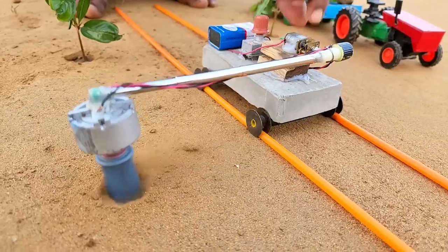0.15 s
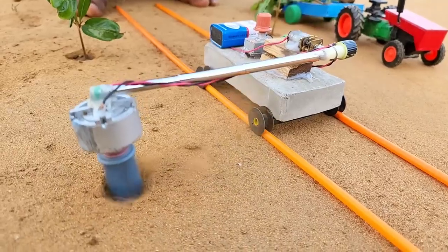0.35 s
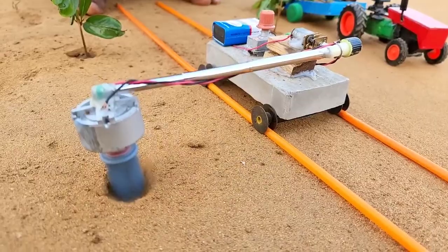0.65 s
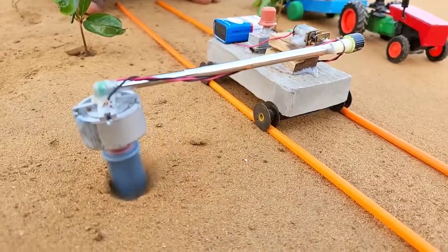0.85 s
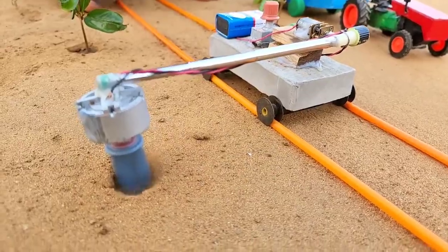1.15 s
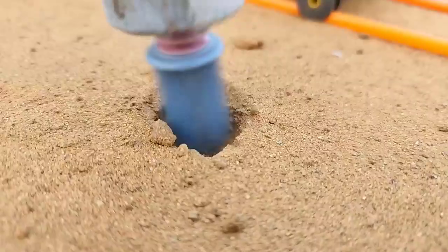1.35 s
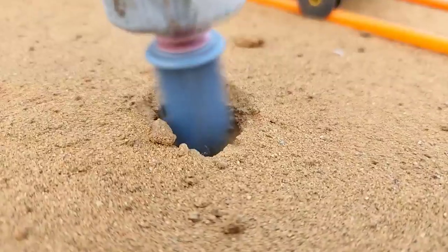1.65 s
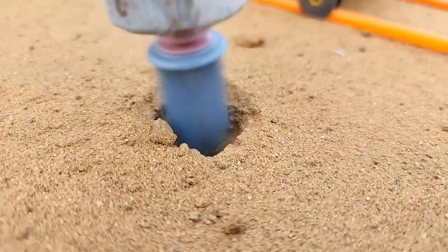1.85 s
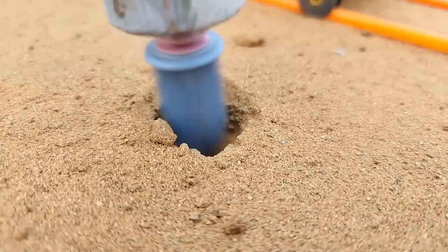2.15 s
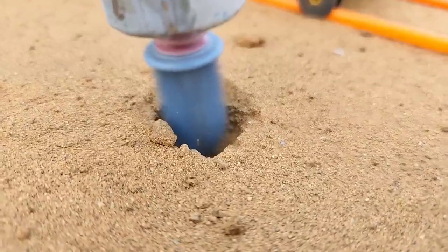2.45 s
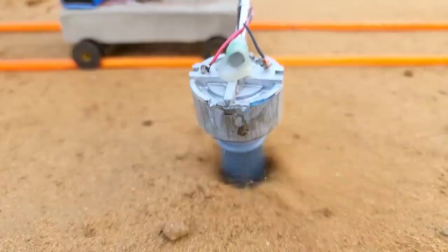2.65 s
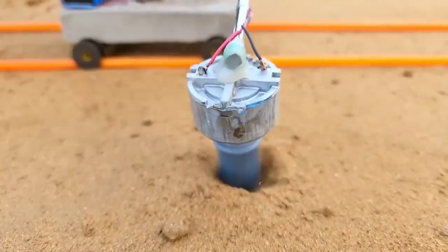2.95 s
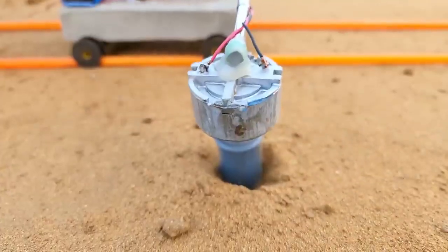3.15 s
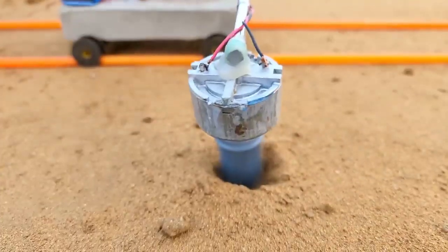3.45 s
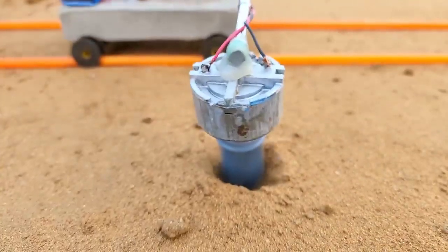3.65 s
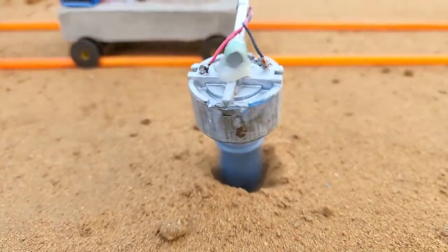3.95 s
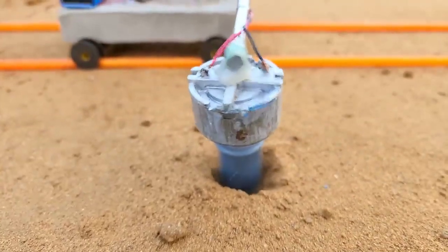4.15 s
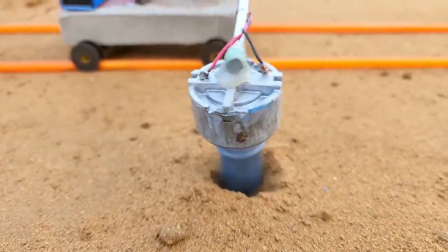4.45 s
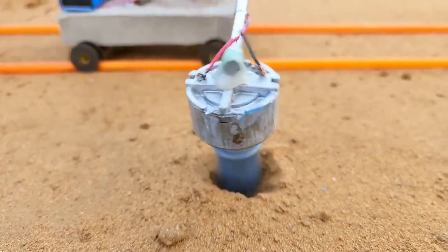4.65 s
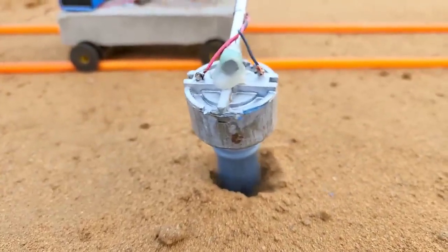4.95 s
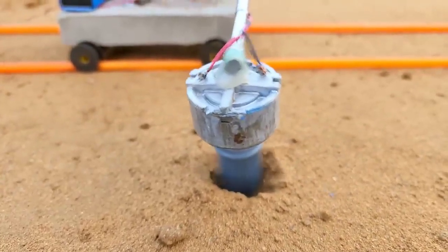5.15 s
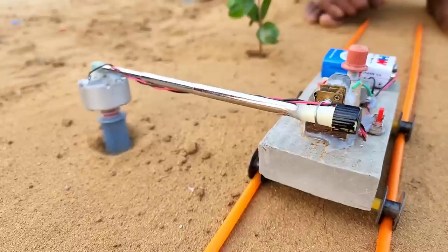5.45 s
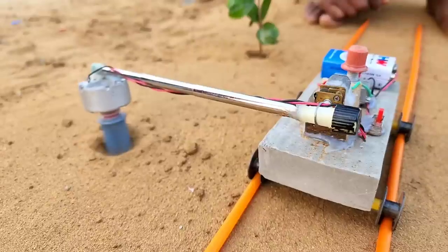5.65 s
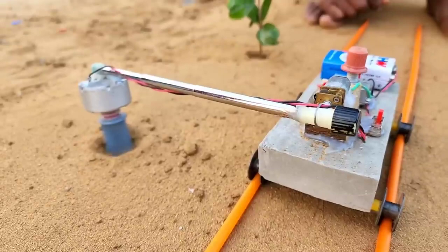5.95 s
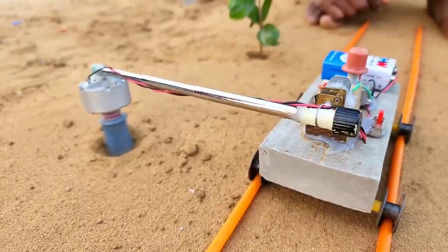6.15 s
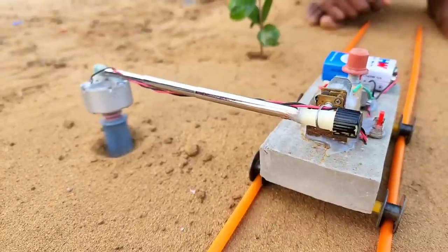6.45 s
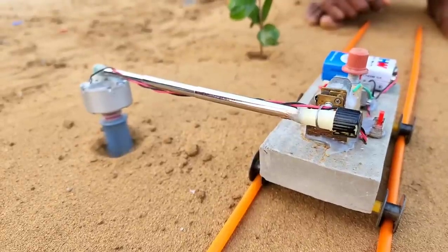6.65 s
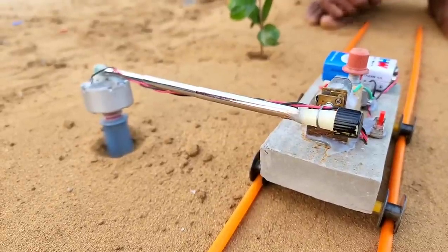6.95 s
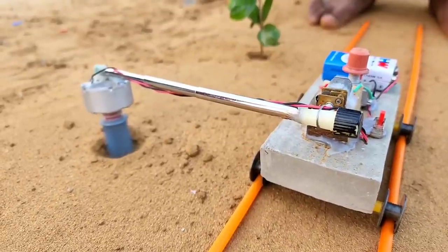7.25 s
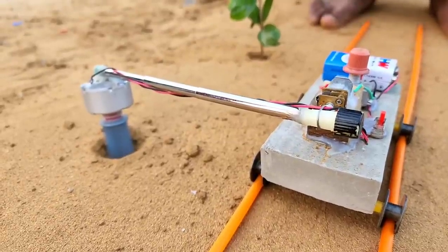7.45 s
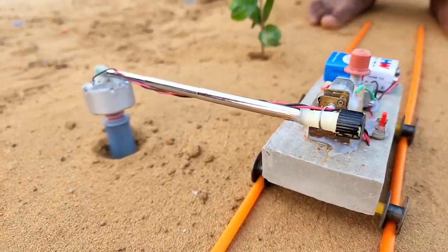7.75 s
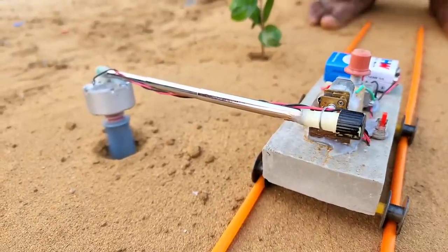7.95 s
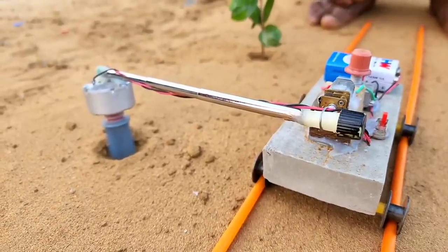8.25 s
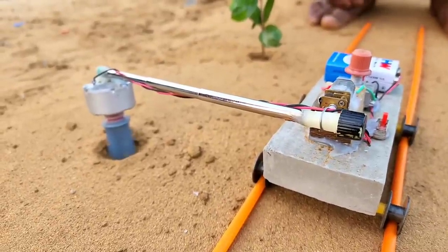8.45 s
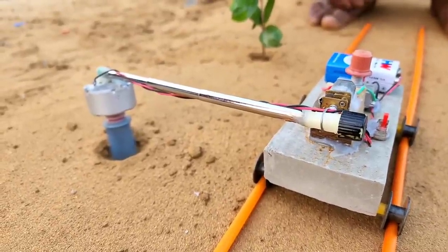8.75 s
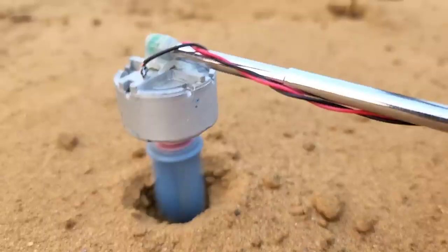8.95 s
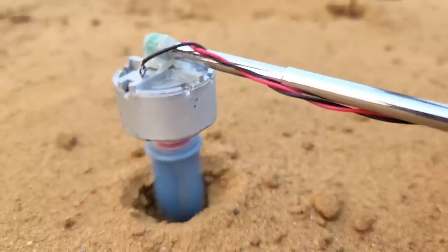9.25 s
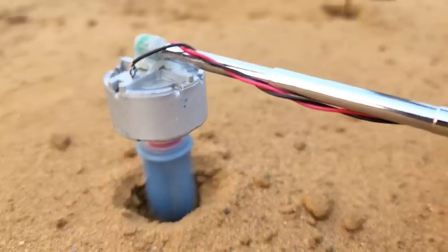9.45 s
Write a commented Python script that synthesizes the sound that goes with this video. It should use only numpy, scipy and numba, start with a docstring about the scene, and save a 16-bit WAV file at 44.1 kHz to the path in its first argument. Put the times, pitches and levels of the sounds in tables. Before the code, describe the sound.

A loose little rotor clatters rapidly against its housing while a plastic tube grinds in dry sand. The buzz rises early, settles, vanishes for an instant, then returns quicker, rough and choked, with many hard ticks and scrapes. Towards the end it becomes lower and more regular, still gritty, with a faint hum and occasional knocks. Close handheld stereo microphone in open air, bright and hissy, with soft wind rumble.

```python
"""A small electric motor turns a plastic auger in sand, heard outdoors through two microphone ports.
The loose rotor knocks its housing each turn, with stray knocks, grinding grit and wind; it speeds up near 0.6 s.
At 2.6 s the sound drops out briefly; then the motor runs faster, and the auger often sticks and breaks free.
From 5.45 to 6.2 s the recorder moves to its last hold and a faint hum comes in; near 7.4 s the thump sings out.
Knocks and grit are shaped noise, the thump is filtered clicks, the hum is sines and the wind is low noise."""
import sys
import numpy as np
from scipy import signal
from scipy.fft import rfft, irfft
from scipy.io import wavfile
from scipy.ndimage import uniform_filter1d
from numba import njit

SR = 44100
rng = np.random.default_rng(int(sys.argv[2]) if len(sys.argv) > 2 else 0)


def log_audio(samples):
    """Write samples as a 16-bit WAV file to the path given in sys.argv[1]."""
    # one column per channel
    frames = np.atleast_2d(samples).T
    # limit to full scale, then quantise
    limited = np.clip(frames, -1, 1)
    pcm = np.round(limited * 32767).astype(np.int16)
    wavfile.write(sys.argv[1], SR, pcm)


N = 422478  # length [samples]

# motor speed: (time [s], speed [turns per s])
SPEED = [(0.0, 71), (0.25, 71.9), (0.47, 81.6), (0.51, 86), (0.62, 93.8), (0.87, 92.8), (0.92, 89.7),
         (1.01, 80.9), (1.06, 79), (1.46, 74.9), (1.55, 75.3), (1.72, 78.0), (1.93, 71.8), (2.09, 72.4),
         (2.22, 65.6), (2.29, 65.6), (2.5, 70.4), (2.6, 71.8), (2.64, 85), (4.1, 87), (5.2, 83), (6.1, 74),
         (6.65, 69.5), (6.9, 72), (7.49, 72.2), (7.81, 76.1), (8.22, 75.8), (8.41, 73.9), (8.93, 76),
         (9.58, 75.5)]
# how much the speed wavers, one value a hold: (share of the speed [1])
UNSTEADY = [.001, .002, .02, .005]
START_TURN = 0.8  # part of a turn already made at the start


def rotor():
    """Adding up the wavering speed gives the turns made so far."""
    wavering = 1 + by_hold(UNSTEADY) * drift(25)
    turns_per_s = in_time(SPEED)[0] * wavering
    return START_TURN + np.cumsum(turns_per_s) / SR


# how the auger meets the sand: (time [s], bite [0 free - 1 held], stutter [dB])
BITE = [(0, 0.2, -2.5), (.5, 0.045, 0), (.66, 0.01, 5), (.75, 0.18, 2.2), (1.4, 0.28, 0.5),
        (2.6, 0.68, 0.7), (2.64, 0.62, 0), (3.4, 0.44, 2.4), (4.2, 0.5, 1.3), (5.4, 0.37, 0.5),
        (5.85, 0.46, 3), (6.3, 0.32, 1.5), (7.3, 0.24, 1.5), (7.9, 0.27, 0.2), (8.7, .27, 1.3),
        (9.58, 0.25, 3.2)]
# the rattle, one row a hold: (grit [dB], rotor thump [dB], change of knocks and grit in the two low bands [dB])
RATTLE = [(-10.5, 17.5, -14), (-10, 18.5, -6), (-13.5, 5.5, -1.3), (-12, 7.5, -4.5)]
# bands in which a knock has a strength of its own:
# (low end [Hz], high end [Hz], likeness at the two ports [0-1], burst width [s], extra grit [dB])
KNOCK_BANDS = [(40, 727, 0.79, 0.0021, -1), (870, 1930, 0.4, .002, 0), (2160, 4900, 0.1, 0.0016, 3.5),
               (4920, 18000, 0.24, .0018, -1)]
# colour given by housing and auger: (frequency [Hz], gain [dB])
BODY = [(60, -16.5), (180, -3.5), (340, -8.5), (640, 10), (900, 7), (1600, 1), (3000, -3), (6000, 2.5),
        (10000, -2), (14500, -2.5), (15400, 3), (15900, -18), (16100, -47)]
# knocks and grit, relative levels before the rattle is brought to its loudness
KNOCK_FREE_DB, KNOCK_HELD_DB = 3.5, -28.5  # knock of each turn
STRAY_FREE_PER_S, STRAY_HELD_PER_S = 43, 170  # how many stray knocks
GRIT_FREE_DB, GRIT_HELD_DB = -2, 0.5  # change of the grit with the bite
STUTTER_TOP = 0.83  # highest swing [about spreads]: the stutter cuts deeper than it swells


def rattle(turns):
    """Knocks are noise bursts a few ms long, grit is steady noise; the housing colours both, and the thump joins."""
    bite, stutter_db = in_time(BITE)
    knock_db = KNOCK_FREE_DB + bite * (KNOCK_HELD_DB - KNOCK_FREE_DB)
    stray_per_s = STRAY_FREE_PER_S + bite * (STRAY_HELD_PER_S - STRAY_FREE_PER_S)
    grit_db, thump_db, low_bands_db = map(by_hold, np.transpose(RATTLE))
    grit_db = grit_db + GRIT_FREE_DB + bite * (GRIT_HELD_DB - GRIT_FREE_DB)

    each_turn = np.diff(np.floor(turns), prepend=0)
    stray_at = rng.random(N) < stray_per_s / SR
    stray_db = 2.4 * np.minimum(rng.exponential(1, N), 2) - 12
    clicks_of_knocks = each_turn * from_db(knock_db) + stray_at * from_db(stray_db)
    blow_shape = hard_knocks()
    held_db = stalls_db()
    catching = drift(44)
    # it catches and frees itself quickly: part of the slow swing is taken out
    catching = catching - 0.22 * uniform_filter1d(catching, size=SR // 20)

    chatter, blows = 0, 0
    for low_hz, high_hz, alike, burst_s, extra_db in KNOCK_BANDS:
        colour_db = 1.4 * rng.standard_normal(N) + 1.4 * drift(6.4)
        knocks = burst(from_db(colour_db) * clicks_of_knocks, burst_s)
        grit = from_db(grit_db + extra_db)
        swing = np.minimum(catching + 0.64 * drift(33), STUTTER_TOP)
        stutter = from_db(stutter_db * swing + held_db + low_bands_db * (low_hz < 1500))
        noise = two_paths(alike, low_hz, high_hz)
        chatter = chatter + noise * stutter * (knocks + grit)
        blows = blows + noise * blow_shape

    chatter = coloured(chatter, BODY) + rotor_thump(each_turn, thump_db)
    # the treble at the left sets the level, so that the mix follows the loudness curve
    treble = band_pass(chatter[0], 9800, 15000, order=4)
    treble_rms = np.sqrt(uniform_filter1d(treble ** 2, size=SR // 5))
    return chatter * from_db(loudness_db()) / treble_rms + coloured(blows, BODY)


# colour of the thump: (frequency [Hz], gain [dB])
THUMP = [(50, -13.5), (150, -2.5), (300, -6), (600, 5), (1100, 4.5), (1600, 3), (2400, -29.5), (16000, -61)]
# the thump sings out for a moment: (time [s], half width [s], swell [dB])
THUMP_SWELL = (7.4, 0.13, 5.6)
THUMP_PATCHY_DB = 2.5  # each band of the thump comes and goes on its own


def rotor_thump(each_turn, thump_db):
    """One click a turn passes three bands and a colour, so quick regular clicks give a pitch."""
    swell_s, width_s, swell_db = THUMP_SWELL
    distance = (np.arange(N) / SR - swell_s) / width_s
    thump_db = thump_db + swell_db * np.exp(-.5 * distance ** 2)
    pulses = each_turn * from_db(thump_db + 2.0 * drift(2.0) + rng.standard_normal(N))
    pulses = np.roll(pulses, round(0.002976 * SR))  # a few ms later, inside the knock's burst
    thump = 0
    for low_hz, high_hz in [(40, 450), (450, 900), (900, 3000)]:
        patchy = from_db(THUMP_PATCHY_DB * drift(5.1))
        thump = thump + patchy * band_pass(pulses, low_hz, high_hz)
    return coloured(thump[None], THUMP)


# the auger breaks free with a blow: (time [s], relative level [dB])
HARD_KNOCKS = [(.645, -14), (2.631, -8), (2.736, -2), (2.783, -9), (3.157, -8), (3.488, -3.5), (3.534, -12),
               (3.652, -7), (3.722, -6.5), (3.815, -9), (3.881, -2), (3.952, -7.5), (3.973, -4),
               (4.008, -5), (4.033, -10), (4.073, -5), (4.16, -4.5), (4.201, -5), (4.252, -6), (4.502, -6),
               (4.624, -9), (4.644, -12), (4.699, -15), (4.843, -10), (4.996, -15), (5.022, -6),
               (5.424, -1), (5.805, -11), (5.859, -6), (6.028, -7), (6.252, -8), (6.292, -14), (6.668, -10),
               (6.813, -5), (7.108, -8), (7.285, -6.5), (7.466, -9), (7.512, -14), (7.671, -6),
               (8.246, -11), (8.351, -8.5), (8.504, -21), (8.795, -8), (8.845, -6), (9.295, -16),
               (9.51, -5.5)]
KNOCK_LOSS_DB, BLOW_S = -14, 0.00095  # change of every blow; its rise [s]
SCRAPE_S, SCRAPE_DB = 0.0079, -18.5  # scrape after each: decay [s]; level against the blow's click


def hard_knocks():
    """Each blow is a short rise and fall, with a scrape that dies away; noise is shaped by this later."""
    at_s, level_db = np.transpose(HARD_KNOCKS)
    hard = clicks(zip(at_s, level_db + KNOCK_LOSS_DB))
    keep = np.exp(-1 / (SCRAPE_S * SR))
    scrape = signal.lfilter([1], [1, -keep], from_db(SCRAPE_DB) * hard + 1e-18)
    return smooth(hard, BLOW_S) + scrape


# the auger sticks and the rattle weakens: (time [s], dip [dB])
STALLS = [(0.651, -9), (.663, -3), (3.298, -8), (3.322, -5), (3.408, -5), (3.524, -11), (3.547, -19),
          (3.608, -12), (3.785, -5), (3.97, -17), (3.995, -14), (4.052, -11), (4.13, -9), (4.189, -8),
          (4.223, -3), (4.341, -6), (4.407, -8), (4.473, -14), (4.564, -7), (4.62, -9), (4.637, -9),
          (4.665, -10), (4.693, -11), (4.957, -10), (4.986, -16), (5.45, -8), (5.986, -7), (6.014, -9),
          (6.151, -8), (6.275, -3), (6.44, -7), (7.263, -7), (7.565, -7), (8.726, -8), (9.093, -6),
          (9.243, -5), (9.32, -4)]
STALL_S = 0.0036  # half width of a dip
HUSH_DB, HUSH_LEAD_S = -5, 0.0029  # it also sticks just before each blow


def stalls_db():
    """While the auger sticks, the level sinks in a short bell-shaped dip."""
    dips = np.zeros(N)
    stall_s, dip_db = np.transpose(STALLS)
    dips[(stall_s * SR).astype(int)] = dip_db
    blow_s = np.transpose(HARD_KNOCKS)[0]
    dips[((blow_s - HUSH_LEAD_S) * SR).astype(int)] += HUSH_DB
    shape = np.exp(-.5 * (np.arange(-600, 601) / SR / STALL_S) ** 2)
    return signal.oaconvolve(dips, shape, "same")


# treble loudness of the rattle between surges, before ring and ports: (time [s], level [dB])
MOTOR = [(0, -30), (.18, -33.5), (.45, -35), (.66, -33.5), (.85, -34.5), (1.2, -33.5), (2.0, -32.5),
         (2.35, -32), (2.6, -32.5), (2.64, -35), (3.3, -32.5), (3.62, -36), (4.35, -36), (5.2, -34),
         (6.0, -34.5), (6.7, -33.5), (7.1, -32), (7.9, -33), (8.8, -32.5), (9.58, -32)]
# the auger grinds harder for a moment: (time [s], swell [dB])
SURGES = [(1.0, 1), (1.25, 1), (1.83, 2.5), (2.14, 3), (2.75, 2.5), (3.82, 3), (4.12, 1.5), (4.5, 2.5),
          (4.88, 2), (5.38, 2.5), (5.85, 1.5), (6.62, 1)]
SURGE_S = 0.044  # half width of a swell


def loudness_db():
    """The slow level with a bell-shaped swell at each surge."""
    s = np.arange(0, N / SR + .01, .005)
    swells = sum(db * np.exp(-.5 * ((s - at) / SURGE_S) ** 2) for at, db in SURGES)
    return in_time(MOTOR)[0] + np.interp(np.arange(N) / SR, s, swells)


# a ring of the housing that swells and fades with the load: (time [s], centre [Hz], width [Hz], gain [dB])
RING = [(0, 6200, 900, -2), (.45, 6300, 900, -2), (.55, 6300, 800, 3), (.68, 6300, 800, 4),
        (.8, 6330, 900, -2), (1.05, 6250, 900, -2.5), (1.17, 6200, 900, 1.5), (1.5, 6300, 900, -1.5),
        (2.2, 6300, 900, 2), (2.35, 6300, 900, -3), (2.64, 5540, 250, -4.5), (7.5, 5670, 250, -2),
        (8, 5600, 220, 3.5), (9.58, 5840, 250, 5.5)]


def housing_ring(x):
    """The housing strengthens or weakens a moving band of the rattle."""
    return bell(x, *in_time(RING))


# hum on the rotor's first three orders, before it wavers: (level [dB])
HUM_DB = [-58, -61, -63]


def hum(turns):
    """Faint wavering sines at one, two and three times the rotor speed come in with the last hold."""
    heard = by_hold([0, 0, 0, 1])
    tones = 0
    for order, db in enumerate(HUM_DB, start=1):
        strength = np.sqrt(2) * heard * from_db(db + 3.7 * drift(2.2))
        tones = tones + strength * np.sin(2 * np.pi * order * turns)
    return tones


# wind at the left port, before it flutters: (time [s], level [dB])
GUSTS = [(0, -33.5), (.34, -40), (1.5, -44.5), (2.61, -44), (2.8, -41), (4.56, -43.5), (5.9, -41.5),
         (6.6, -49), (7.3, -44), (8.7, -48), (9.58, -46.5)]
# short buffets added to the gusts: (time [s], peak level [dB])
PUFFS = [(0.118, -28), (0.22, -27), (0.568, -33), (0.705, -31), (0.829, -36), (1.05, -32), (1.364, -39),
         (1.652, -34), (2.649, -28.5), (2.827, -27.5), (3.341, -38), (5.83, -41), (6.771, -36)]
# colour of the wind: (frequency [Hz], relative gain [dB])
WIND = [(15, -27), (30, -2.5), (62, 2), (100, -3), (150, -3), (250, -12), (400, -23.5), (800, -31),
        (16000, -87)]
# wind at the right port against the left, one value a hold: (level [dB])
SHELTER_DB = [-34, -20, -4.5, -8]


def wind():
    """Moving air makes a lumpy low rumble with short buffets, from separate noise in each port."""
    rumble = coloured(rng.standard_normal((2, N)), WIND)
    high_pass = signal.butter(2, 40, "high", fs=SR, output="sos")
    rumble = rms_one(signal.sosfilt(high_pass, rumble))
    strength = from_db(in_time(GUSTS)[0]) + smooth(clicks(PUFFS), 0.012)
    left_db = 2.0 * drift(12.0)
    right_db = by_hold(SHELTER_DB) + 1.2 * drift(2.5)
    return rumble * strength * from_db([left_db, right_db])


# how much later the right port hears the rattle, one value a hold: (delay [samples])
LAG_SAMPLES = [23, 18, 14, 16]


def later(x):
    """Sound reaches the right port a little later, depending on the hold."""
    return np.interp(np.arange(N) - np.round(by_hold(LAG_SAMPLES)), np.arange(N), x)


# hollow of the hand at the right port: (time [s], centre [Hz], width [Hz], gain [dB])
HAND = [(0, 3070, 1090, 10.5), (.4, 2950, 1200, 15.5), (.6, 2950, 1200, 15), (.68, 2960, 1280, 18.5),
        (2.6, 3120, 1020, 15), (2.64, 8510, 1800, 18.5), (5.45, 8670, 1860, 16), (5.62, 6430, 4070, 16.5),
        (5.8, 4500, 4230, 12.5), (6.1, 5070, 2300, 12.5), (6.35, 5480, 1360, 16.5), (7, 5180, 1370, 14),
        (8, 5440, 1460, 15.5), (8.6, 5340, 1390, 14.5), (9.58, 5070, 1450, 11)]


def hand_hollow(x):
    """The hollow of a hand near the port has a resonance that shifts."""
    return bell(x, *in_time(HAND))


# peaks and dips at each port, one row a hold, in each row several of: (centre [Hz], width [Hz], gain [dB])
LEFT_PORT = [
    [(8810, 1400, 12.5), (6500, 730, 9), (12800, 640, 4), (3860, 410, -11), (7500, 780, -11),
     (2080, 150, -7), (1090, 800, 8.5)],
    [(8870, 880, 10.5), (6300, 630, 5), (12300, 430, 5), (4070, 360, -18), (7450, 570, -3.5),
     (2200, 320, -16), (1150, 310, 0)],
    [(8930, 1320, 15), (6100, 3600, 1.5), (12100, 510, 7), (3100, 1140, -6.5), (9800, 1600, -5.5),
     (2030, 990, 8), (1570, 2600, -0.8)],
    [(9160, 1700, 11.5), (5800, 1200, 2), (12070, 630, 5.5), (3220, 1600, -7), (9780, 2200, -4),
     (1860, 1240, 4.5), (1230, 1300, 0)],
]
RIGHT_PORT = [
    [(6300, 1100, 7), (4500, 1340, -13), (7300, 800, -3.5), (12600, 640, 8.7), (348, 1500, -1),
     (5360, 600, -0.5)],
    [(6440, 1300, 6), (3970, 850, -18), (7660, 630, -18), (12600, 450, 5), (348, 2900, -8.5),
     (5300, 600, -5.5)],
    [(5260, 3700, 5), (2140, 3500, -2), (10100, 2300, -2.5), (12300, 700, -5), (900, 750, -1),
     (5850, 800, -0.5)],
    [(7150, 1330, 9), (3620, 1810, 9), (8700, 1420, -14.5), (11900, 550, 5.5), (816, 3900, -3),
     (6300, 540, -2)],
]


def port(x, holds):
    """The sound passes each resonance of a microphone port in turn."""
    for resonance in np.transpose(holds, axes=(1, 2, 0)):
        x = bell(x, *map(by_hold, resonance))
    return x


# the four ways the recorder is held, and the moves between them: (time [s], hold number [0-3])
HOLD = [(0, 0), (2.6, 1), (2.64, 2), (5.45, 2), (6.2, 3)]


def by_hold(values):
    """One value for each hold, passing into the next as the recorder moves."""
    s, hold = np.transpose(HOLD)
    value_at_hold = np.take(values, hold.astype(int))
    return in_time(list(zip(s, value_at_hold)))[0]


def from_db(db):
    """Decibels become a plain factor."""
    return np.exp(np.asarray(db) * (np.log(10) / 20))


def rms_one(x):
    """Scale to an average strength (rms) of 1."""
    return x / np.sqrt(np.mean(x ** 2) + 1e-20)


def in_time(rows):
    """Join the points of a table with straight lines, one curve for each column after the time."""
    s, *columns = np.transpose(rows)
    return [np.interp(np.arange(N) / SR, s, c) for c in columns]


def smooth(x, seconds):
    """Double one-pole low-pass: a click becomes a short rise and fall of its own height."""
    r = np.exp(-1 / (seconds * SR))
    return signal.lfilter([np.e / (seconds * SR)], [1, -2 * r, r * r], x + 1e-18)


def drift(per_s):
    """Smoothed noise of spread 1 wanders by chance; per_s sets how fast."""
    return rms_one(smooth(rng.standard_normal(N), 1 / (2 * np.pi * per_s)))


def clicks(events):
    """Silence with one single-sample click for each (time [s], level [dB])."""
    train = np.zeros(N)
    for s, peak_db in events:
        train[round(s * SR)] = from_db(peak_db)
    return train


def burst(x, seconds):
    """A click becomes a bell-shaped swell with a sharp tick at its top, over in four times the given width."""
    s = np.arange(round(4 * seconds * SR)) / SR / seconds - 2
    swell, tick = 0.69 * np.exp(-2 * s ** 2), 0.39 * np.exp(-30 * s ** 2)
    return signal.oaconvolve(x, swell + tick)[:N]


def band_pass(x, low_hz, high_hz, order=2):
    """Keep what lies between two frequencies."""
    return signal.sosfilt(signal.butter(order, [low_hz, high_hz], "band", fs=SR, output="sos"), x)


def two_paths(alike, low_hz, high_hz):
    """A band of noise for both ports, partly shared."""
    shared, *own = rng.standard_normal((3, N))
    alike = np.clip(alike, 0, 1)
    mix = np.sqrt(alike) * shared + np.sqrt(1 - alike) * np.array(own)
    return band_pass(mix, low_hz, high_hz)


def coloured(x, spectrum):
    """Causal filter with the given spectrum (minimum phase from the folded cepstrum)."""
    size = 4096
    hz, db = np.transpose(spectrum)
    grid = np.maximum(np.arange(size // 2 + 1) * SR / size, 1)
    cepstrum = irfft(np.log(from_db(np.interp(np.log(grid), np.log(hz), db))))
    cepstrum[1:size // 2] *= 2
    cepstrum[size // 2 + 1:] = 0
    response = irfft(np.exp(rfft(cepstrum)))
    return signal.oaconvolve(x, response[None], axes=1)[:, :N]


def bell(x, hz, width, db):
    """A moving peak or dip whose settings are renewed every 32 samples."""
    hz, width, db = hz[::32], width[::32], db[::32]
    settings = np.cos(2 * np.pi * hz / SR), np.tan(np.pi * width / SR), from_db(db / 2)
    # the last block may be cut short by the end of the sound
    return moving_bell(x, *np.repeat(settings, 32, axis=1))


@njit
def moving_bell(x, cos_w, alpha, gain):
    """Peak or dip filter that takes its centre, width and height anew at each sample."""
    y = np.zeros_like(x)
    for i in range(2, len(x)):
        up, down = alpha[i] * gain[i], alpha[i] / gain[i]
        y[i] = ((1 + up) * x[i] - 2 * cos_w[i] * (x[i - 1] - y[i - 1]) + (1 - up) * x[i - 2]
                - (1 - down) * y[i - 2]) / (1 + down)
    return y


def scene():
    """The rattle reaches two ports by different ways; hum and wind are added."""
    turns = rotor()
    left, right = (housing_ring(side) for side in rattle(turns))
    left = port(left, LEFT_PORT)
    right = port(hand_hollow(later(right)), RIGHT_PORT)
    return np.array([left, right]) + hum(turns) + wind()


# overall gain, steady before and after a brief drop-out: (time [s], gain [dB])
GAP = [(2.604, 5), (2.612, -14), (2.62, -25), (2.627, -62), (2.632, 1.5)]
CUTOFF_HZ = 16400  # from here up the sound is at least 70 dB down


def record(dry):
    """Peaks are rounded, the gain drops out once, the top is cut."""
    rounded = 1.151 * np.tanh(dry / 1.187)
    wet = rounded * from_db(in_time(GAP)[0])
    return signal.sosfilt(signal.cheby2(12, 70, CUTOFF_HZ, fs=SR, output="sos"), wet)


dry = scene()
out = record(dry)
log_audio(out)
```